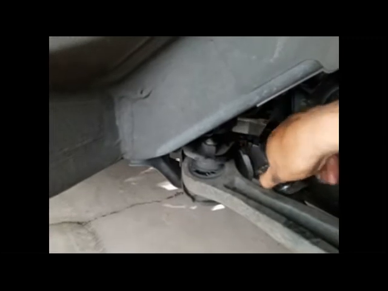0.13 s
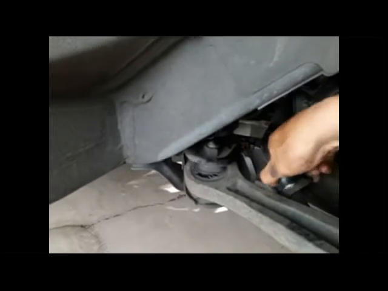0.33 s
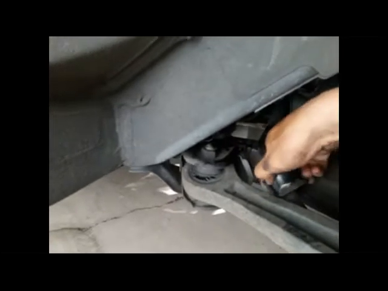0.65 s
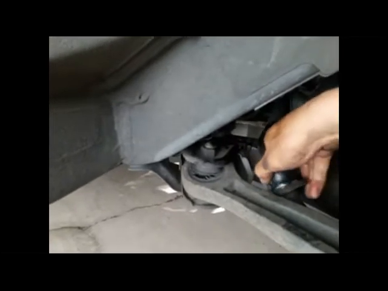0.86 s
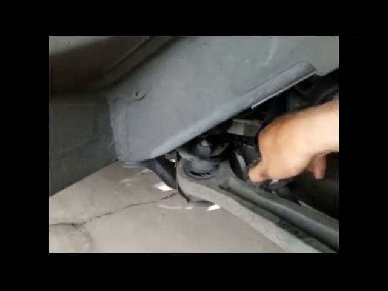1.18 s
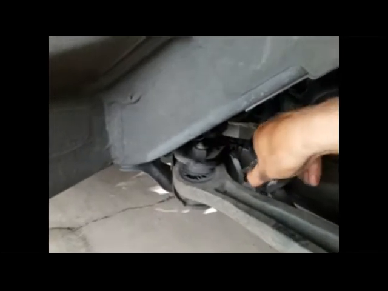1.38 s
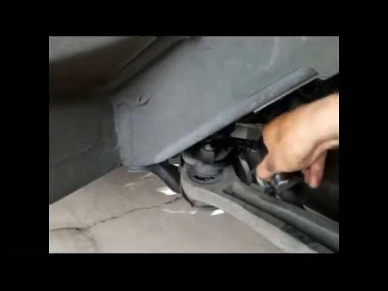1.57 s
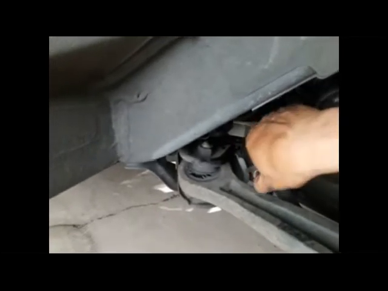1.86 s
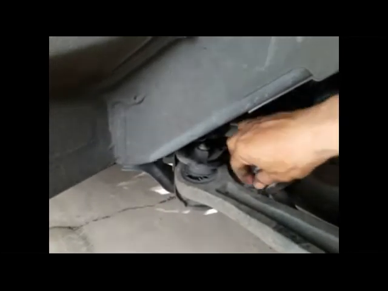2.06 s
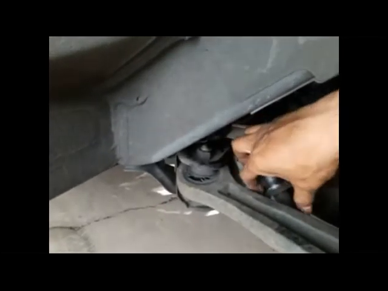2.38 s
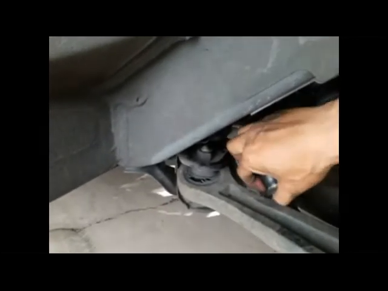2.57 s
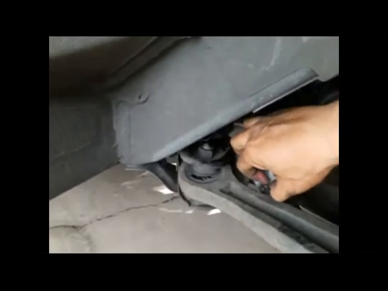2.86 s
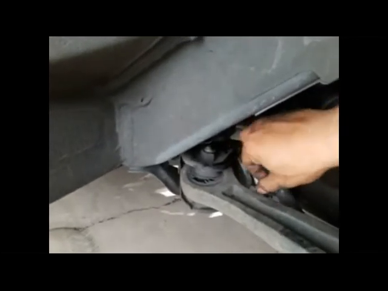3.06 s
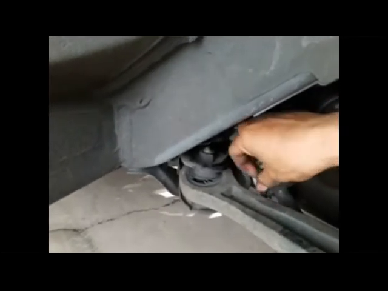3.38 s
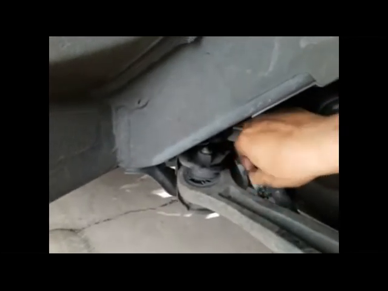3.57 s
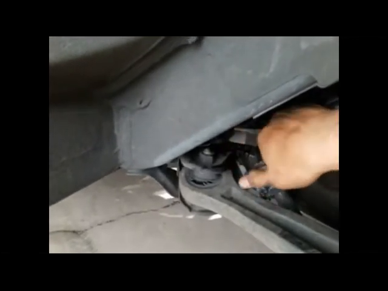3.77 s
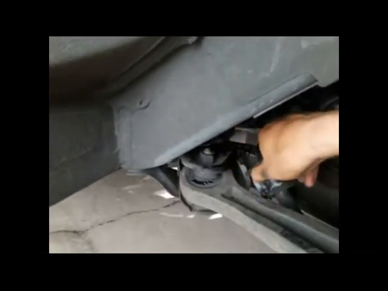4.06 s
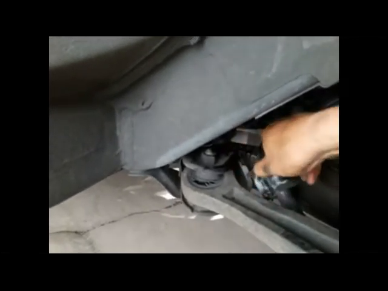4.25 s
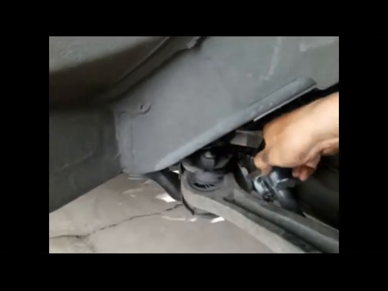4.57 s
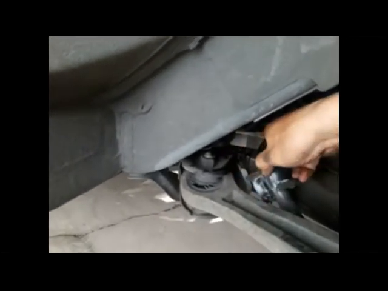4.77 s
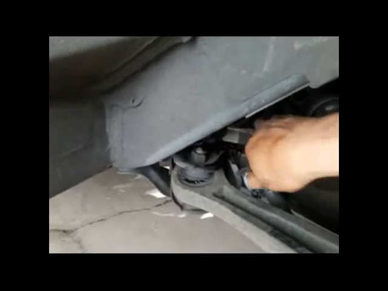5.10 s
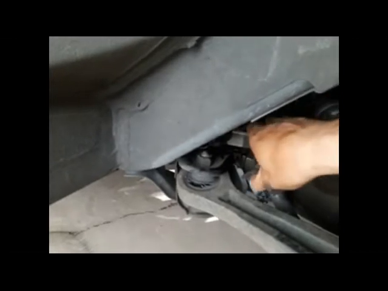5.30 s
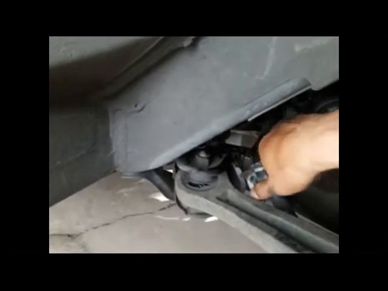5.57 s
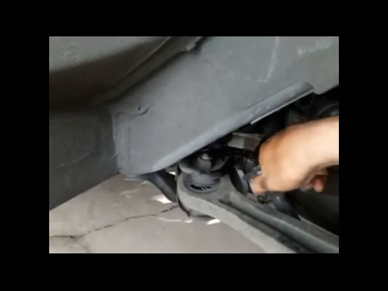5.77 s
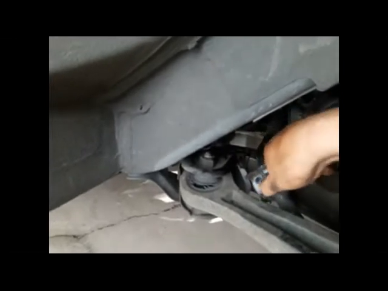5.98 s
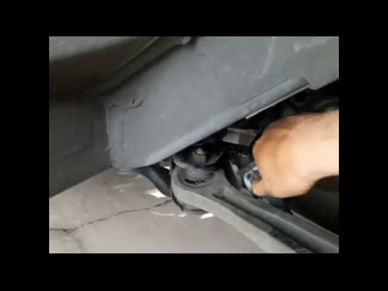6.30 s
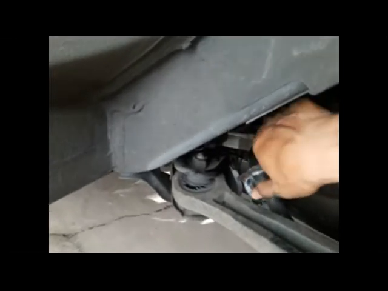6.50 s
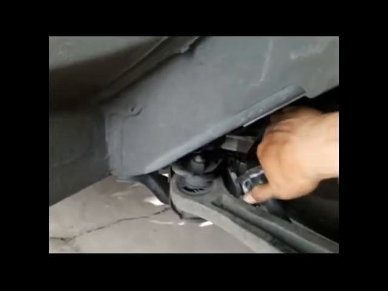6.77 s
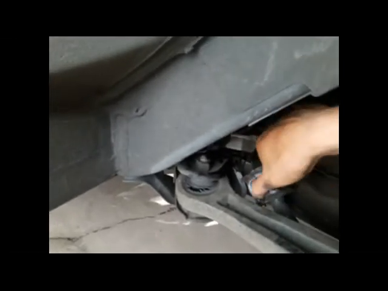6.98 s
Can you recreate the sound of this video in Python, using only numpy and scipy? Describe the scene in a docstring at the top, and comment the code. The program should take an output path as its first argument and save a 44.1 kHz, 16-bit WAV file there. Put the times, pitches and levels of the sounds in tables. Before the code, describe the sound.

An engine hums low as a hand works a socket on a car's underside bolt, clicking and knocking; then a second engine pulls away.

```python
"""Under a parked car, two microphone ports close to a hand that turns a socket on a bolt. From the
start the street washes in from afar and an engine drones nearby through its exhaust pipe. Skin rubs on
metal, the thread hums, the socket clicks, and dull knocks ring through the bodywork. Around three
seconds the drone slows and recovers. A second engine comes into earshot; near six seconds, as the drone
fades, it revs up and pulls away, and the hardest knock and clicks land over it."""
import sys
import numpy as np
from scipy import signal
from scipy.fft import rfft, irfft, next_fast_len
from scipy.io import wavfile
from scipy.ndimage import uniform_filter1d

SR = 44100
rng = np.random.default_rng(int(sys.argv[2]) if len(sys.argv) > 2 else 0)


def store_wav(level_fs):
    """Save 16-bit WAV to argv[1]."""
    pcm = np.round(np.clip(np.atleast_2d(level_fs), -1, 1) * 32767)
    wavfile.write(sys.argv[1], SR, pcm.T.astype(np.int16))


N = 314874


def gain_of(db):
    """Decibels to gain."""
    return 10 ** (np.asarray(db) / 20)


def unit_rms(x):
    """Scales to rms 1."""
    return x / np.sqrt(np.mean(x ** 2) + 1e-20)


def at_hz(points, hz):
    """Reads a spectrum on a log-frequency axis."""
    f, value = np.transpose(points)
    return np.interp(np.log(hz + 1), np.log(f + 1), value)


def curves(rows):
    """A gain that fades within 50 ms outside a timed table, and the table's columns at every sample."""
    s, *columns = np.transpose(rows)
    t = np.arange(N) / SR
    fade = np.clip(1 + np.minimum(t - s[0], s[-1] - t) * 20, 0, 1)
    return fade, [np.interp(t, s, c) for c in columns]


def patchy_noise(field_db, size, patchy_db):
    """Two unrelated noises, together of rms 1, shaped by field_db(hz, s) and broken into patches."""
    frames, hz = 4 * N // size + 5, np.fft.rfftfreq(size, 1 / SR)[:, None]
    a, b, c, d, patches = rng.standard_normal((frames, len(hz), 5)).T
    patches = unit_rms(uniform_filter1d(uniform_filter1d(patches, size=9, axis=0), size=9, axis=1))
    shape = gain_of(field_db(hz, np.arange(frames) * size / 4 / SR) + patchy_db * patches)
    spectra = np.array([a + 1j * b, c + 1j * d]) * shape
    return unit_rms(signal.istft(spectra, nperseg=size, noverlap=3 * size // 4)[1][:, :N])


def street():
    """Distant tyre and engine wash; the bass swells less than the middle."""
    # Colour of the wash. Each row: frequency in Hz, relative level in dB.
    wash = [(12, -47), (20, -30.5), (32, -27.5), (45, -24), (62, -14), (85, -6.5), (125, -7.5), (176, -6),
            (197, -6.5), (246, -14), (344, -12), (455, -20.5), (841, -21), (1310, -28.5), (1550, -29),
            (6630, -53), (12200, -71.5), (15700, -102.5)]
    # Passing traffic. Each row: time in seconds, relative level in dB, brightening in dB per octave.
    traffic = [(0.0, -48, -0.5), (0.54, -48, -2.5), (1.69, -47, -0.5), (1.93, -45.5, -2), (4.36, -48, 2),
               (4.65, -51.5, 1.5), (5.809, -47, 0), (6.18, -44.5, 2), (6.5, -45, 2), (6.72, -43, 1.5),
               (7.14, -44, 2)]
    s, level_db, bright_db = np.transpose(traffic)

    def field_db(hz, t):
        swell_share = np.clip(np.log2((hz + 1) / 60), 0, 2) / 2
        swell_db = np.interp(t, s, level_db) - level_db.mean()
        treble_octaves = np.maximum(np.log2((hz + 1) / 700), 0)
        return at_hz(wash, hz) + swell_share * swell_db + treble_octaves * np.interp(t, s, bright_db)

    return gain_of(-45.5) * patchy_noise(field_db, size=2048, patchy_db=2.0)


def drift(top_hz):
    """Slow random wander of rms 1."""
    t = np.arange(0, N + 512, 512) / SR
    rates = np.geomspace(top_hz / 8, top_hz, num=12)
    slow = sum(np.sin(2 * np.pi * (f * t + rng.random())) / np.sqrt(f) for f in rates)
    return np.interp(np.arange(N) / SR, t, unit_rms(slow))


def engine_cycles(speed, order, beat_s):
    """Rate in Hz and running count of engine cycles, zero at beat_s, from the pitch of one order."""
    _, (order_hz,) = curves(speed)
    hz = uniform_filter1d(order_hz, size=4000) / order
    count = np.cumsum(hz) / SR
    return hz, count - count[round(beat_s * SR)]


def engine_order(turns, db, waver_db):
    """One tone wavering about rms level db; the second row is its echo, a quarter turn away."""
    phase = 2 * np.pi * turns
    level = np.sqrt(2) * gain_of(db + waver_db * drift(top_hz=5))
    return level * np.array([np.cos(phase), np.sin(phase)])


def droning_engine(pipe_hz=177.1):
    """A nearby engine; its orders light up as they slide through the exhaust pipe's resonance."""
    # The drone. Each row: time in seconds, 11th order in dB, pipe in dB, resonance width in Hz.
    levels = [(0, -67, -47, 6), (.5, -53, -42, 8), (.8, -46, -45.5, 5.1), (.93, -44.5, -40, 5),
              (1.1, -44, -34.5, 4.5), (1.3, -42, -35, 5.7), (1.5, -42.5, -39.5, 9.8),
              (1.8, -38.5, -36.5, 9.6), (2.15, -40, -35.5, 8), (2.35, -41.5, -35, 13), (2.65, -46, -36, 12),
              (2.85, -50, -36, 9.1), (3.15, -59, -32.5, 5.5), (3.35, -41.5, -34.5, 3),
              (3.55, -52, -43, 3.9), (4.05, -42, -44.5, 9), (4.7, -49.5, -49.5, 4.4), (5, -50, -60, 8),
              (5.3, -44, -45.5, 5), (5.6, -46.5, -40.5, 13), (5.8, -66, -65, 6)]
    # Engine speed. Each row: time in seconds, pitch of the 11th order in Hz.
    speed = [(0, 89.5), (.5, 89.5), (1, 90), (1.5, 88.4), (2, 89.6), (2.4, 89.2), (2.7, 86.8), (2.9, 84),
             (3.15, 81.8), (3.5, 80), (3.8, 81.5), (4.05, 84.1), (4.4, 87), (4.7, 88), (5, 85), (5.3, 87.5),
             (5.6, 91.5)]
    # Weaker tones. Each row: order of the engine cycle, level in dB.
    minor_orders = [(10, -57), (12, -56), (13, -54), (14, -54), (16, -49), (17, -56), (18, -58)]
    fade, (hum_db, pipe_db, width_hz) = curves(levels)
    hz, count = engine_cycles(speed, order=11, beat_s=2.59)
    response = {k: 1 / (1 + 2j * (k * hz - pipe_hz) / width_hz) ** 2 for k in range(19, 27)}
    total = np.sqrt(sum(abs(g) ** 2 for g in response.values()))
    pipe = sum(abs(g) / total * engine_order(k * count + np.angle(g) / (2 * np.pi), pipe_db, waver_db=1.6)
               for k, g in response.items())
    minor = sum(engine_order(k * count + rng.random(), db, waver_db=2.5) for k, db in minor_orders)
    hum = engine_order(11 * count, hum_db, waver_db=1.1)
    return fade * (hum + pipe + minor)


def strokes(rows, rise=0.77, fall=1.07):
    """Gain of hand strokes; each swells 10 dB in rise * reach seconds and sinks 10 dB in fall * reach."""
    t = np.arange(0, N + 64, 64) / SR
    power = sum(gain_of(db - 10 * np.where(t < s, (s - t) / rise, (t - s) / fall) / reach) ** 2
                for s, db, reach in rows)
    return np.interp(np.arange(N) / SR, t, np.sqrt(power))


def skin_rubbing(grain_db=1.5, grain_s=0.004, rest_db=-76.5):
    """Friction hiss of skin that catches and slips on metal; the hand never lies quite still."""
    # Colour of the friction. Each row: frequency in Hz, relative level in dB.
    colour = [(700, -12), (2000, 2.5), (4000, -0.5), (7000, 0), (8500, -9.5), (12000, -10.5),
              (15500, -23.5)]
    # Strokes of the hand. Each row: peak time in seconds, level in dB, reach in seconds.
    rubs = [(.1, -70, 0.15), (.2, -60.5, 0.037), (.36, -69.5, 0.1), (.71, -63, 0.04), (.92, -70, 0.12),
            (1.12, -62.5, 0.07), (1.5, -68, 0.06), (1.535, -61.5, 0.035), (1.68, -64, 0.06),
            (1.81, -64, 0.059), (1.94, -70.5, 0.2), (2.21, -59, 0.08), (2.39, -71, 0.035),
            (2.52, -72.5, 0.084), (2.76, -69.5, .04), (2.842, -56.5, 0.02), (2.92, -68, 0.036),
            (3.31, -70, 0.06), (3.55, -71, 0.07), (3.72, -70, .04), (3.86, -70, 0.064), (4.49, -68, 0.02),
            (4.66, -79, 0.1), (4.87, -59.5, 0.05), (5.13, -61, 0.02), (5.33, -67.5, 0), (5.4, -64, 0.02),
            (5.64, -76, .06), (5.97, -79, 0.3), (6.19, -68, 0.085), (6.3, -66, 0.034), (6.46, -68.5, .07),
            (6.58, -65, 0.063), (6.76, -70, 0.1), (6.95, -65, 0.03)]
    hiss = patchy_noise(lambda hz, t: at_hz(colour, hz) - 60 * (hz < 500), size=256, patchy_db=2.5)
    slip = unit_rms(uniform_filter1d(rng.standard_normal(N), size=round(grain_s * SR)))
    grains = unit_rms(gain_of(grain_db * slip))
    return (strokes(rubs) * grains + gain_of(rest_db)) * hiss


def thread_hum():
    """The bolt's thread hums as the socket turns: resonances fed by noise."""
    # Thread resonances. Each row: frequency in Hz, width in Hz, relative level in dB.
    resonances = [(1160, 200, -8), (1650, 400, -9), (2130, 200, -1), (2480, 250, -7), (3250, 190, -4)]
    # Turns of the socket. Each row: peak time in seconds, level in dB, reach in seconds.
    turns = [(.79, -63, 0.1), (.93, -58, 0.1), (1.33, -63, 0.2), (2.62, -60.5, 0.02), (3.28, -58, 0.14),
             (4.56, -71, 0.2), (5.44, -67, 0.3), (6.23, -58.5, .09)]

    def ring_db(hz, t):
        power = sum(gain_of(2 * db) / (1 + (2 * (hz - f) / width) ** 2) ** 2 for f, width, db in resonances)
        return 10 * np.log10(power)

    return strokes(turns) * patchy_noise(ring_db, size=1024, patchy_db=4.0)


def ringing(modes, centre_hz, spread, t, skirt_db=9, brighten_db=2, build_s=0.00083):
    """Struck modes ring most near the blow's colour, each at its own angle to the ports."""
    side, ring = np.array([[0.5], [-0.5]]), 0
    for hz, db, t60, pan_db, lead in modes:
        octaves = np.log2(hz / centre_hz)
        # High modes take more of a hard contact; one spread off centre costs skirt_db.
        level = gain_of(db + brighten_db * octaves - skirt_db * (octaves / spread) ** 2 + side * pan_db)
        ring += level * gain_of(-60 * t / t60) * np.sin(2 * np.pi * hz * t + side * lead)
    return ring * (1 - np.exp(-t / build_s))


def blows(events, modes, dense_db, dense_turns, own_db, own_turns, rattle_db, crack_db, crack_s=0.0012):
    """Each blow is a sharp contact and a short rattle that ring the metal; turns are cycles per t60."""
    out, t = np.zeros((2, N + SR)), np.arange(SR // 4) / SR
    ring_t = t[:SR // 6]
    for s, db, centre_hz, spread, t60 in events:
        rattle = rng.standard_normal(len(t)) * gain_of(-60 * t / t60)
        force = (t == 0) + gain_of(rattle_db) * rattle / np.linalg.norm(rattle)
        # The contact rings at its own pitch, among many short-lived modes of the parts around.
        own_mode = (centre_hz, own_db, own_turns / centre_hz, 1.0, -0.6)
        place, pan, lead = rng.uniform(-2, 2, size=(3, 60))
        dense_hz = np.minimum(centre_hz * 2 ** (spread * place), SR / 3)
        dense = [(f, dense_db, dense_turns / f, 3 * p, a * np.pi / 2) for f, p, a in zip(dense_hz, pan, lead)]
        ring = ringing([*modes, own_mode, *dense], centre_hz, spread, ring_t)
        # The bare contact cracks before anything rings.
        crack = rng.standard_normal((len(ring_t), 2)).T * np.exp(-ring_t / crack_s)
        crack = signal.sosfilt(signal.butter(2, centre_hz, fs=SR, output="sos"), crack)
        ring += gain_of(crack_db) * crack * np.linalg.norm(ring) / np.linalg.norm(crack)
        sound = signal.fftconvolve(force[None], ring, axes=1)[:, :len(t)]
        # Soft contact dulls what lies far from the colour.
        edges_hz = np.clip(centre_hz * 2 ** (1.3 * spread * np.array([-1, 1])), 100, 12500)
        sound = signal.sosfilt(signal.butter(3, edges_hz, "band", fs=SR, output="sos"), sound)
        at = round(s * SR)
        out[:, at:at + len(t)] += gain_of(db) * sound / abs(sound).max(axis=1).mean()
    return out[:, :N]


def body_knocks(spread_octaves=0.684, octaves_per_db=0.036):
    """Dull knocks through the bodywork; a harder knock rings a wider band."""
    # The knocks. Each row: start in seconds, peak in dB, colour centre in Hz, rattle t60 in seconds.
    knocks = [(.176, -38.5, 612, .12), (1.861, -42, 517, .065), (2.025, -32.5, 545, 0.1),
              (2.389, -47, 480, .13), (2.88, -39.5, 576, .19), (3.57, -25, 1200, 0.085),
              (3.583, -31, 858, 0.09), (4.25, -48.5, 448, .1), (4.893, -42.5, 800, .033),
              (5.169, -30.5, 560, .15), (5.87, -47.5, 600, .15), (6.602, -19, 1400, 0.085),
              (6.613, -26, 1200, 0.086), (6.711, -29.5, 874, 0.072), (6.722, -30.5, 747, 0.072)]
    # Bodywork modes. Each row: frequency in Hz, level in dB, t60 in seconds, left over right in dB,
    # left lead in radians.
    modes = [(360, 0, 0.082, 1, .3), (539, 9.5, 0.061, -2, 1), (748, 1.5, 0.095, -3.5, .3),
             (924, 2, .07, -3, -2.5), (1060, -4, .1, -2, -1), (1147, -0.5, .075, 0, 1),
             (1498, 4.5, 0.061, 3.5, -0.9), (1815, -3.5, .06, 0.5, -1.6), (2003, -0.5, 0.038, -1, 0.2),
             (2320, -7.5, .045, 3, 0), (2850, -12, 0.041, 13, 0), (3300, -16, 0.039, 3, 0)]
    events = [(s, db, hz, spread_octaves + octaves_per_db * (db + 40), t60) for s, db, hz, t60 in knocks]
    return blows(events, modes, dense_db=-9.0, dense_turns=78.0, own_db=-12.5, own_turns=34.0,
                 rattle_db=-5.0, crack_db=-10.0)


def socket_clicks():
    """The socket clicks on the bolt and rings, bright and brief."""
    # The clicks. Each row: start in seconds, peak in dB, colour centre in Hz, spread in octaves,
    # rattle t60 in seconds.
    clicks = [(.424, -51.5, 2230, 0.73, .04), (.6985, -40, 3000, 0.91, 0.046), (.701, -38, 1870, .9, .07),
              (.705, -43, 1190, .5, .05), (.713, -42, 1860, 1.25, .06), (.843, -53, 6060, 1.2, .03),
              (0.894, -51, 2880, 0.42, .16), (.93, -49.5, 2880, 0.45, .1), (.946, -51, 2100, 0.71, .05),
              (.975, -56, 4500, 1.2, 0.028), (1.044, -50.5, 3570, 0.54, 0.14), (1.089, -50, 4370, 1, .05),
              (1.54, -55, 7000, 1.3, .03), (1.666, -48, 3430, 1.4, .08), (1.806, -43, 4380, 1.2, .07),
              (1.862, -50.5, 2620, 1.2, .05), (2.393, -51.5, 5030, 1.3, .03),
              (2.638, -50, 2500, 0.35, 0.069), (2.754, -49, 3000, 1.1, .065), (2.82, -54, 4830, .15, 0.025),
              (2.829, -52, 6500, 1.4, .05), (2.841, -49, 1800, 0.57, .03), (2.847, -38, 1980, 1.24, .08),
              (2.912, -43.5, 2070, .6, 0.023), (3.462, -52, 2520, 1.6, .03), (3.571, -46.5, 6240, 1.3, .06),
              (3.722, -47, 2400, 0.39, 0.053), (4.421, -49.5, 1930, 0.57, .045),
              (4.472, -40.5, 2020, 1.4, 0.066), (4.481, -47, 2200, 1.6, .03),
              (4.497, -39, 2040, 1.35, 0.046), (4.826, -56, 6500, .35, .15), (4.837, -47, 2930, 1, .1),
              (4.859, -46, 2860, .9, 0.043), (4.881, -45, 4800, 1.2, .04), (4.893, -42.5, 3300, 1.24, .04),
              (4.974, -50, 3300, 1.1, .04), (5.123, -46.5, 2430, 0.42, 0.068),
              (5.345, -44.5, 2400, 0.3, .04), (5.399, -51, 2420, .37, 0.066), (5.433, -49, 2200, 1.7, .035),
              (6.469, -49, 4000, 1.1, .035), (6.602, -49.5, 7270, 0.22, 0.044),
              (6.7105, -27, 6000, .65, 0.034), (6.7115, -30, 3170, 0.75, .04),
              (6.7245, -29.5, 6500, 1.2, .035)]
    # Socket modes. Each row: frequency in Hz, level in dB, t60 in seconds, left over right in dB,
    # left lead in radians.
    modes = [(1190, 0, .035, 1.5, 0.5), (1520, -5.5, 0.022, 0.5, 4), (2040, -2.5, 0.023, 1, -1.5),
             (2455, -5.5, .018, 3, -2.5), (2918, -1.5, 0.023, 9, 1.4), (3300, -5, 0.015, 1.5, 2),
             (3680, -3.5, .018, -1, 1.5), (4780, -6, .014, 3, 2.5), (5440, -5.5, 0.016, 2, 3),
             (6000, -0.5, 0.0098, 2, 0.4), (6560, -1, 0.0096, 7, -0.8), (7500, -1, 0.0091, 0, -1.5),
             (8880, -1.5, .005, -4, 0.5), (11500, -6, 0.0048, -2.5, -1)]
    return blows(clicks, modes, dense_db=-6.5, dense_turns=25.7, own_db=4.5, own_turns=32.0,
                 rattle_db=1.5, crack_db=-6.0)


def revving_engine(earshot_s=3.75, throttle_s=5.83):
    """A second engine pulls away: firing harmonics, and the throb of eight uneven firings a cycle."""
    # Engine speed. Each row: time in seconds, firing rate in Hz.
    speed = [(3.5, 58.4), (3.8, 59.1), (4.15, 61.7), (4.4, 55.7), (4.65, 53.3), (4.9, 51.5), (5.15, 54.7),
             (5.35, 56.5), (5.5, 62.6), (5.65, 70.7), (5.8, 81.7), (5.95, 89.7), (6.15, 96.6),
             (6.35, 101.8), (6.55, 106.8), (6.75, 110.3), (6.95, 113.0), (7.1, 113.6)]
    # The exhaust with the throttle shut. Each row: pitch of a firing harmonic in Hz, level in dB.
    exhaust = [(52, -80), (58, -76), (63, -60), (82, -48), (92, -45), (112, -46), (124, -48), (155, -45.5),
               (176, -39), (188, -50), (205, -61), (250, -59), (280, -51), (305, -60.5), (340, -53.5)]
    # Colour of the throb. Each row: frequency in Hz, relative level in dB.
    throb_colour = [(35, -38.5), (50, -23), (70, -14.5), (90, 1), (125, -2.5), (150, -9), (185, -2.5),
                    (250, -25.5), (290, -18.5), (350, -4.5), (450, -29.5), (800, -22)]
    t = np.arange(N) / SR
    hz, count = engine_cycles(speed, order=8, beat_s=6.885)  # the throb peaks at beat_s
    approach_db = 30 * np.minimum(t - earshot_s, 0)
    # The throttle snaps open and lifts the firing tone; the throb grows more slowly under load.
    lift_db = 12.3 * np.clip((t - throttle_s) / 0.045, 0, 1)
    throb_db = -56 + 12 * np.clip((t - throttle_s) / 0.65, 0, 1)
    firing = sum(engine_order(k * count, at_hz(exhaust, k * hz) + lift_db * share, waver_db=2.5)
                 for k, share in [(8, 1.0), (16, 0.37), (24, 0.0)])
    orders = [k for k in range(5, 60) if k % 8 or k > 24]
    offsets = rng.random(len(orders)) * (np.array(orders) > 10)  # only the low orders stay in step
    throb = sum(engine_order(k * count + offset, throb_db + at_hz(throb_colour, k * hz), waver_db=1.5)
                for k, offset in zip(orders, offsets))
    return gain_of(approach_db) * (firing + throb)


def microphone_ports(field, left_lag_s=0.0001):
    """The left port hears the field's first row; the right mixes in the second, unrelated reflections."""
    # Likeness of the two ports. Each row: frequency in Hz, correlation from -1 to 1.
    likeness = [(30, 1), (130, 0.97), (200, 0.99), (370, 0.81), (640, 0.55), (1150, -0.2), (1800, -0.15),
                (2700, 0.15), (4000, 0.055), (15000, 0.23)]
    # Balance of the ports. Each row: frequency in Hz, left over right in dB.
    balance = [(30, 5.5), (125, 0), (300, 3), (600, -3), (1100, 2.5), (2500, 1.5), (5000, 2.5),
               (9000, -1.5), (15000, 0)]
    size = next_fast_len(N + 4096)
    hz = np.fft.rfftfreq(size, 1 / SR)
    direct, reflected = rfft(field, size)
    same = np.clip(at_hz(likeness, hz), -1, 1)
    left = direct * np.exp(-2j * np.pi * hz * left_lag_s)  # the street lies nearer the right port
    right = same * direct + np.sqrt(1 - same ** 2) * reflected
    tilt = gain_of(at_hz(balance, hz) / 2)
    return irfft(np.array([left * tilt, right / tilt]), size)[:, :N]


def underbody_echo(x, echo_db=-15.5, low_t60=0.13, treble_t60=0.07, rise_s=0.006):
    """The gap between floor pan and concrete scatters each blow into short echoes, unlike at each port."""
    t = np.arange(SR // 3) / SR
    taps = rng.standard_normal((2, len(t))) * (1 - np.exp(-t / rise_s))
    low = signal.sosfilt(signal.butter(2, 2500, fs=SR, output="sos"), taps)
    treble = (taps - low) * gain_of(-60 * t / treble_t60)
    low *= gain_of(-60 * t / low_t60)
    response = (low + treble) / np.linalg.norm(low[0])
    return x + gain_of(echo_db) * signal.oaconvolve(x, response, axes=1)[:, :N]


def scene():
    """Engines, street and friction through the port pair; the close blows echo under the car."""
    close = socket_clicks() + body_knocks()
    field = droning_engine() + revving_engine() + street() + skin_rubbing() + thread_hum()
    return microphone_ports(field) + underbody_echo(close)


def record(dry):
    """A steep band limit at 15750 Hz."""
    lowpass = signal.firwin(1023, 15750, window=("kaiser", 9), fs=SR)
    return signal.oaconvolve(dry, lowpass[None], "same")


dry = scene()
out = record(dry)
store_wav(out)
```